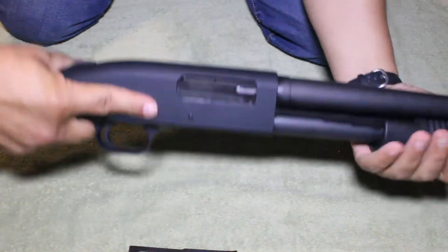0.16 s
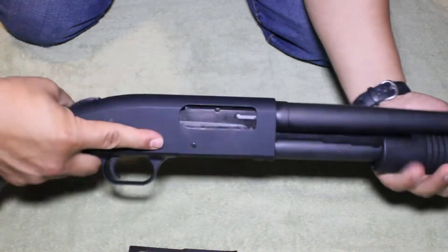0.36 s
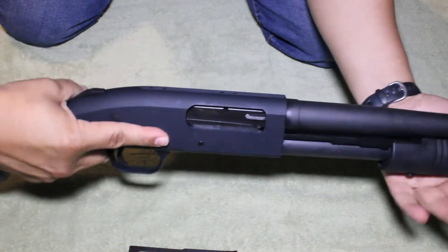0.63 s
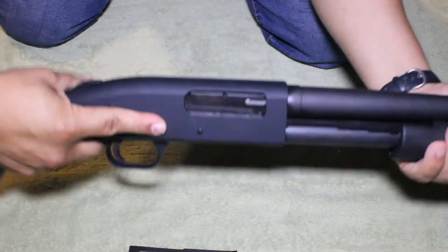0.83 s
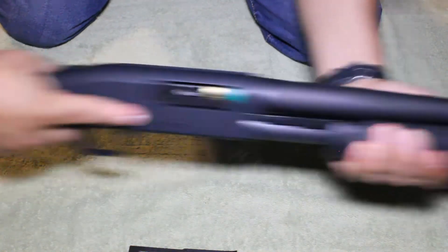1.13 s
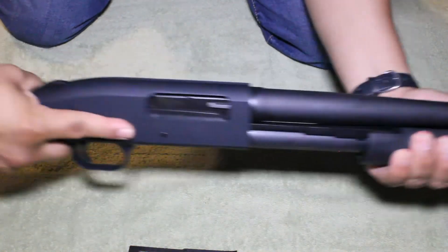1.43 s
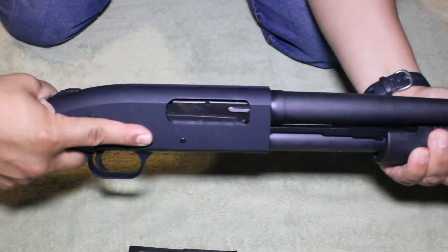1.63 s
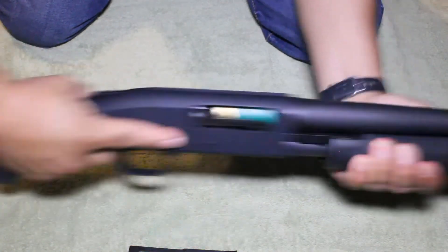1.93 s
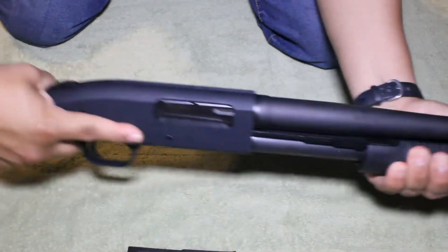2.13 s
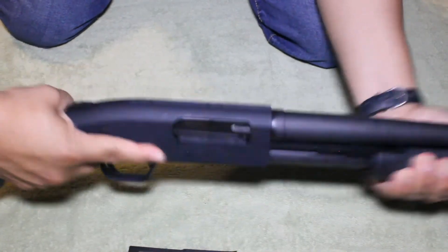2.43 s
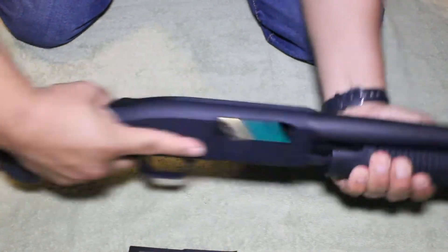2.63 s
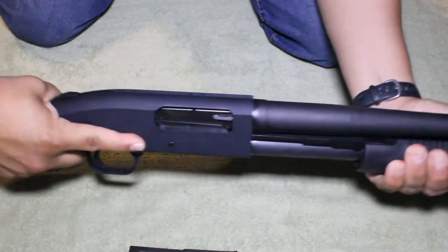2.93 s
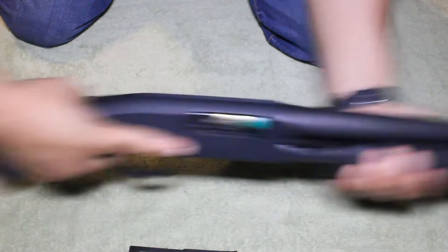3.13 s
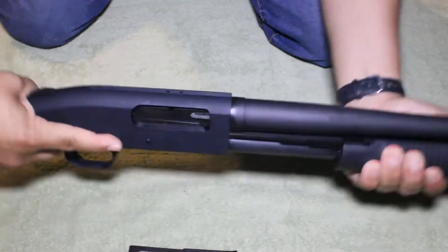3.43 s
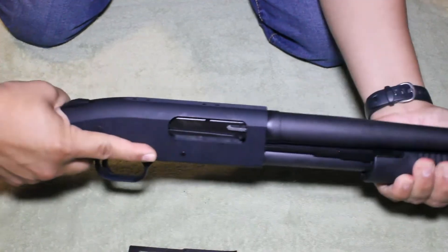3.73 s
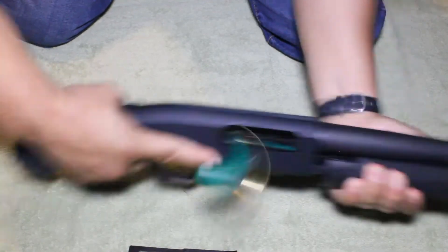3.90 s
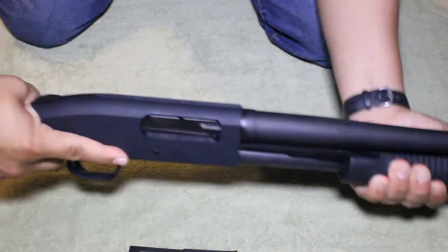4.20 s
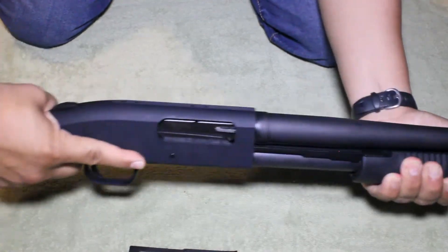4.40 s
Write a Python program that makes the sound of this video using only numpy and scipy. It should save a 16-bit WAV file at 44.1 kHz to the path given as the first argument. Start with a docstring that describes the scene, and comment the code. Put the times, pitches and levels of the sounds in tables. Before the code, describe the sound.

A pump-action shotgun is racked hard again and again, loud sharp metallic clacks close up in a small quiet room.

```python
"""A small quiet room, with a pump shotgun racked hard again and again close to the microphone.
Each pull and push plays its own fixed run of steel contacts, bursts of tiny impacts ringing the gun's modes.
Damped sine clusters make the hollow plastic knocks; band-limited bursts make the stock thumps and scuffs.
Shaped noise makes the shuffling cloth, hiss and low rumble; steady sines make a thin whine.
The room answers with dense reflections and a few low standing waves."""
import sys
import numpy as np
from scipy import signal
from scipy.fft import rfft, irfft
from scipy.io import wavfile
from scipy.ndimage import uniform_filter1d, map_coordinates

SR = 44100
rng = np.random.default_rng(int(sys.argv[2]) if len(sys.argv) > 2 else 0)


def pcm_store(signal):
    """Save signal as 16-bit PCM."""
    levels = np.round(np.clip(np.atleast_2d(signal), -1, 1) * 32767)
    wavfile.write(sys.argv[1], SR, levels.astype(np.int16).T)


N = 200998
TIME = np.arange(N) / SR  # s
HZ = np.fft.rfftfreq(4096, 1 / SR)  # frequency grid of every filter

# spectrum of the background hiss: [pitch_hz, density_db_per_hz (relative)]
HISS_SPECTRUM = [(120, -41), (200, -10.5), (465, -8), (1060, -6), (3560, -12), (4860, -10), (8120, -18),
                 (9060, -19), (9930, -15.5), (16000, -26.5)]
# steady tones of the whine: [pitch_hz, rms_level_db]
WHINE_TONES = [(4696, -64), (9394, -63.8), (14088, -80)]
# sinking of the background after each stop, brief and lasting: [depth_db, recovery_s]
BACKGROUND_DIPS = [(-19, .165), (-4.4, 1.7)]
# decay of the room's reflections: [pitch_hz, t60_s]
ROOM_DECAY = [(150, 0.083), (400, .32), (1040, 0.31), (3300, 0.32), (7300, 0.32), (15000, 0.24)]
# colour of the room's reflections: [pitch_hz, level_db]
REFLECTION_COLOUR = [(100, -5.5), (400, -1.5), (1200, 1), (3500, 4.5), (8000, 0), (15000, 0.5)]
# low standing waves that ring on after soft sounds: [pitch_hz, gain_db, t60_s]
STANDING_WAVES = [(76, -9, .24), (168, -3, .3), (270.4, -7, .45), (398, -2.5, .21)]
# spectrum of rubbing cloth: [pitch_hz, density_db_per_hz (relative)]
CLOTH_SPECTRUM = [(25, -9), (50, -7), (78, 0), (120, -2), (270, -8.5), (500, -14), (1200, -32.5),
                  (4000, -42.5), (16000, -61)]
# sleeves and knees shuffling on the mat: [start_s, length_s, level_db]
CLOTH_MOVES = [(0, .04, -62), (2.09, .02, -62), (2.65, .26, -50.5), (3.0, .08, -53)]
# palm scuffing the forend: [start_s, level_db, pitch_hz, length_s]
PALM_SCUFFS = [(0, -50, 1610, .11), (.240, -47, 1450, .08), (1.626, -28, 2300, .017),
               (2.733, -41.5, 1520, .012), (3.747, -39.5, 1510, .014), (4.385, -39, 1420, .037)]
# faint pure tones that linger after a contact: [start_s, level_db, pitch_hz, t60_s]
LINGERING_TONES = [(.6905, -30, 3950, .04), (1.100, -44, 263, .2), (3.315, -43, 270, .39),
                   (4.030, -44, 5250, .59)]
# dull thumps of stock, hands and shells on the mat: [start_s, level_db, pitch_hz, t60_s]
SOFT_BLOWS = [(1.093, -22, 86.6, .032), (1.987, -27, 409, .032), (2.002, -23, 380, .036),
              (2.094, -41.5, 199.5, .079), (2.358, -24.5, 248, .044), (2.64, -32, 85, .09),
              (2.733, -34, 330, .16), (2.843, -40.5, 600, .057), (2.984, -43, 260, .11),
              (3.246, -20.5, 420, .043), (3.312, -35, 125, .04), (3.504, -33, 320, .039),
              (3.716, -50, 200, .071), (4.101, -35.5, 406, .046), (4.157, -38, 560, .059)]
# thump of the stock at the end of a pull: [delay_after_stop_s, level_db, pitch_hz, t60_s]
PULL_STOCK_THUMP = (.003, -25.5, 335, .04)
# the same at the end of a push: [delay_after_stop_s, level_db, pitch_hz, t60_s]
PUSH_STOCK_THUMP = (.011, -27, 268, .045)
# hollow knocks of forend and shells: [start_s, level_db, pitch_hz, t60_s]
HOLLOW_KNOCKS = [(.286, -30, 990, .023), (.419, -32.5, 1094, .013), (.6795, -20.5, 1600, .03),
                 (.789, -31.5, 1180, .014), (.8216, -15.5, 1610, .025), (.825, -16.5, 1620, .022),
                 (1.021, -26.5, 1707, .069), (1.634, -10, 2380, .016), (1.634, -23.5, 986, .063),
                 (2.004, -22.5, 1650, .06), (2.742, -23, 1760, .07), (2.748, -21.5, 1530, .065),
                 (3.248, -12.5, 1664, .04), (3.755, -25.5, 1450, .051)]
# overall colour of the steel action: [pitch_hz, density_db_per_hz (relative)]
STEEL_COLOUR = [(59, -43.5), (100, -17), (381, -17), (662, -11), (1130, -6.5), (1280, -2), (1450, -6.5),
                (1680, -2), (2080, -2), (2470, -1), (2690, -2.5), (3700, 0.5), (12100, -1.5), (15000, -3),
                (16000, -30)]
# modes of receiver, barrel and magazine tube: [pitch_hz, width_hz, nominal_db_above_colour]
GUN_MODES = [(1343, 70, 3), (1636, 110, 3.5), (1902, 40, 0), (2140, 40, -0.5), (2453, 70, 3.5),
             (3280, 180, 1), (3550, 120, 1.5), (4381, 70, -2), (4700, 40, 4.5), (5390, 60, 3),
             (6554, 120, 4.5), (6980, 58, 3.5), (9794, 44, 6.5), (12700, 100, 4.5)]
# contacts of a pull; latch and unlock count from their own moments, the rest from the stop:
# [part, offset_s (before slowness), bass_db, middle_db, treble_db (before stroke trims), t60_s, chatter_s]
PULL_CONTACTS = [("latch", 0, -47, -33, -31, .035, 0), ("unlock", 0, -39, -18.5, -25, .023, 0),
                 ("bolt", -.0472, -33, -19, -10, .024, 0), ("travel", -.039, -40, -16, -8.5, .042, 0),
                 ("travel", -.024, -40, -18.5, -10, .036, 0), ("travel", -.0135, -42, -26, -11, .055, 0),
                 ("travel", -.007, -42, -24.5, -21, .035, 0), ("stop", 0, -34, -17.5, -12, .032, .013),
                 ("stop", .0195, -43, -24, -15, .055, 0), ("rebound", .044, -40, -24, -15.5, .062, 0),
                 ("rebound", .055, -57, -28, -22, .015, 0)]
# contacts of a push, timed alike:
# [part, offset_s (before slowness), bass_db, middle_db, treble_db (before stroke trims), t60_s, chatter_s]
PUSH_CONTACTS = [("latch", 0, -55, -30, -27, .07, 0), ("unlock", 0, -49, -31, -28, .1, 0),
                 ("bolt", -.042, -36.5, -25, -9.5, .028, 0), ("travel", -.05, -52, -33, -25, .03, .022),
                 ("travel", -.035, -43, -19, -14, .048, 0), ("stop", -.0195, -29, -13, -9.5, .043, 0),
                 ("stop", -.0145, -36, -26, -19, .02, 0), ("stop", 0, -33, -21.5, -12, .032, .015),
                 ("rebound", .036, -42, -23.5, -25, .05, 0)]
# pulls, with a trim for each part (body is bass and middle): [stop_s, slowness (ratio), latch_s, unlock_s,
# body_db, latch_db, unlock_db, bolt_db, travel_db, stop_db, rebound_db, thump_db]
PULL_STROKES = [(.8899, 1.03, .8215, .8355, 1, 0, -8, .5, .5, 0, 0, -1.5),
                (1.6936, .975, 1.6172, 1.635, 0, 3, 2, 1, .5, 1, 0, -3),
                (2.4281, .97, 2.3536, 2.3709, -1.5, -7, 0, -2, -.5, -.5, -2, 3),
                (3.0877, .93, 3.0165, 3.031, -1, -5, -5, -6, 0, .5, -3, 0),
                (3.8191, 1.0, 3.7541, 3.7653, .5, -3, -4, -9, .5, 0, -10, -7),
                (4.4596, 1.0, 4.39, 4.4058, -.5, -7, 0, -7, 0, 0, -15, 2)]
# pushes, trimmed alike: [stop_s, slowness (ratio), latch_s, unlock_s,
# body_db, latch_db, unlock_db, bolt_db, travel_db, stop_db, rebound_db, thump_db]
PUSH_STROKES = [(1.0839, .98, 1.015, 1.0214, 1.5, -2.5, -5, -1, -14, .5, -9, 3),
                (1.9087, 1.01, 1.8376, 1.8556, 0, 0, -5, 0, -15, 1, -1, -2),
                (2.6318, 1.01, 2.5545, 2.5685, 0, -3, 2, -5, -1, -.5, 0, 5.5),
                (3.3018, 1.01, 3.2259, 3.249, 0, 5.5, 7.5, -8, 5, -1, -10, -6),
                (4.0081, .99, 3.9457, 3.9537, 0, 6.5, 4, -2, -7, .5, -8, -1.5)]
# contacts of catches, loose shells and grip between strokes: [start_s, bass_db, middle_db, treble_db, t60_s]
LOOSE_CONTACTS = [(.252, -55, -48.5, -49, .2), (.286, -43.5, -43.5, -47, .04),
                  (.6808, -43, -29.5, -42.5, .02), (.6905, -37, -26.5, -40, .031),
                  (1.9858, -34.5, -28.5, -46, .054), (1.9964, -35, -27, -11, .018),
                  (2.0019, -31, -24, -15.5, .02), (2.7434, -31, -24, -22.5, .045),
                  (2.782, -38.5, -48.5, -41, .017), (2.818, -55, -54, -44, .014),
                  (3.503, -50, -54, -51, .016), (3.7188, -56, -53.5, -56, .02),
                  (3.74, -59.5, -49.5, -52, .021), (4.2811, -61, -61, -55, .017)]
# typical faint tick of settling hands: [bass_db, middle_db, treble_db, t60_s]
HAND_TICK = (-58, -53, -60, .04)


def gain_of(db):
    """Decibels to amplitude."""
    return 10 ** (np.asarray(db) / 20)


def evened(x):
    """Scaled to rms 1."""
    return x / np.sqrt(np.mean(x ** 2) + 1e-20)


def read(points, hz):
    """A spectrum table read on a log-frequency axis."""
    f, value = np.transpose(points)
    return np.interp(np.log(hz + 1), np.log(f + 1), value)


def add(mix, s, sound):
    """Mixes a sound in at time s."""
    part = mix[max(round(s * SR), 0):][:len(sound)]
    part += sound[:len(part)]


def dying(t, t60):
    """Amplitude that falls 60 dB in t60 seconds."""
    return np.exp(-np.log(1000) * t / max(t60, 1e-3))


def band(lo_hz, hi_hz, order=4):
    """Gain of a band-pass with smooth skirts."""
    low_side = 1 + (lo_hz / (HZ + 1)) ** (2 * order)
    high_side = 1 + (HZ / hi_hz) ** (2 * order)
    return 1 / np.sqrt(low_side * high_side)


def causal(gain):
    """Minimum-phase impulse response: a body with this gain rings only after the blow."""
    mirrored = np.r_[gain, gain[-2:0:-1]]
    log_gain = np.log(np.maximum(mirrored / gain.max(), 1e-4))
    response = np.fft.ifft(np.exp(np.conj(signal.hilbert(log_gain)))).real
    return response[:len(HZ) // 2]


def noise(gain):
    """Steady noise of rms 1, shaped by this gain over frequency."""
    spectrum = rfft(rng.standard_normal(N))
    return evened(irfft(spectrum * np.interp(np.fft.rfftfreq(N, 1 / SR), HZ, gain), N))


def strike(force, response):
    """A burst of tiny random impacts rings a body; the sound has the energy of the force."""
    sound = signal.fftconvolve(force * rng.standard_normal(len(force)), response)
    return sound * np.sqrt(np.sum(force ** 2) / (np.sum(sound ** 2) + 1e-20))


def background(hiss_db=-56, rumble_db=-57.5, rumble_lo_hz=108, rumble_hi_hz=158, rumble_sink=0.56):
    """Noise hiss and rumble with a sine whine; all sink after each stop and swell back, the rumble less."""
    level_db = np.zeros(N)
    for stop, *_ in list(PULL_STROKES) + list(PUSH_STROKES):
        for depth_db, recovery in BACKGROUND_DIPS:
            level_db += depth_db * (TIME > stop) * np.exp(-abs(TIME - stop) / recovery)
    hiss = gain_of(hiss_db) * noise(gain_of(read(HISS_SPECTRUM, HZ)))
    rumble_band = band(rumble_lo_hz, rumble_hi_hz, order=8)
    rumble = gain_of(rumble_db + rumble_sink * level_db) * noise(rumble_band)
    whine = sum(np.sqrt(2) * gain_of(db) * np.sin(2 * np.pi * hz * TIME) for hz, db in WHINE_TONES)
    return (hiss + whine) * gain_of(level_db) + rumble


def room(x, wet_db=-9.5, first_s=0.0034, build_s=0.0017, count=6, turn_hz=17):
    """Reflections, each band dying at its own speed; equally dense patterns take turns to keep the ringing smooth."""
    out = np.zeros(N)
    for k in range(count):
        hz, t, z = signal.stft(rng.standard_normal(SR * 2 // 3), SR, nperseg=256)
        decay = np.exp(-np.log(1000) * t / read(ROOM_DECAY, hz)[:, None])
        colour = gain_of(read(REFLECTION_COLOUR, hz))[:, None]
        tail = signal.istft(z * decay * colour, SR)[1]
        since_first = np.maximum(np.arange(len(tail)) / SR - first_s, 0)
        tail *= 1 - np.exp(-since_first / build_s)
        # the patterns take turns, turn_hz rounds a second
        away = abs((TIME * turn_hz * count - k) % count - count / 2)
        share = np.cos(np.pi / 2 * np.minimum(away, 1))  # the squares of all shares sum to 1
        out += signal.fftconvolve(x * share, tail / np.linalg.norm(tail))[:N]
    return gain_of(wet_db) * out


def boom(x):
    """Standing waves of the room: decaying cosines excited by the sound x."""
    t = np.arange(SR // 2) / SR
    response = np.zeros(len(t))
    for hz, db, t60 in STANDING_WAVES:
        decay = dying(t, t60)
        # scaled so that db is the gain at its own pitch
        response += gain_of(db) * np.cos(2 * np.pi * hz * t) * decay * 2 / decay.sum()
    return signal.fftconvolve(x, response)[:N]


def shuffle(rise_s=.015, t60_s=.35, rest_db=-78, lumps_db=2):
    """Dull rubbing of cloth over a faint steady rustle: each move rises, drags unevenly and dies away."""
    moves = np.zeros(N)
    for s, length, db in CLOTH_MOVES:
        rise = np.clip((TIME - s) / rise_s, 0, 1)
        moves += gain_of(db) * rise * dying(np.maximum(TIME - s - length, 0), t60_s)
    lumps = evened(uniform_filter1d(rng.standard_normal(N), size=1300))
    envelope = gain_of(rest_db) + moves * gain_of(lumps_db * lumps)
    return noise(gain_of(read(CLOTH_SPECTRUM, HZ))) * envelope


def scuffs(breadth=1.1):
    """Short rubs swell and fade in the hollow plastic, as noise in a narrow band."""
    out = np.zeros(N)
    for s, db, hz, length in PALM_SCUFFS:
        force = gain_of(db) * np.sin(np.pi * np.linspace(0, 1, int(length * SR) + 2))
        add(out, s, strike(force, causal(band(hz / breadth, hz * breadth, order=3))))
    return out


def rings():
    """Lightly damped single modes."""
    out, t = np.zeros(N), np.arange(SR // 2) / SR
    for s, db, hz, t60 in LINGERING_TONES:
        add(out, s, gain_of(db) * np.sin(2 * np.pi * hz * t) * dying(t, t60))
    return out


def stock_thumps():
    """The stop shakes the stock: one (start_s, level_db, pitch_hz, t60_s) for every stroke."""
    found = []
    for thump, strokes in [(PULL_STOCK_THUMP, PULL_STROKES), (PUSH_STOCK_THUMP, PUSH_STROKES)]:
        delay, db, hz, t60 = thump
        found += [(row[0] + delay, db + row[-1], hz, t60) for row in strokes]
    return found


def thumps(breadth=1.48, rise_s=.002):
    """Soft blows push a broad low resonance."""
    out, t = np.zeros(N), np.arange(SR // 5) / SR
    for s, db, hz, t60 in stock_thumps() + list(SOFT_BLOWS):
        force = gain_of(db) * dying(t, t60) * (1 - np.exp(-t / rise_s))
        add(out, s - rise_s, strike(force, causal(band(hz / breadth, hz * breadth, order=3))))
    return out


def knocks(spread=.09, overtone_db=-9, rise_s=0.00047):
    """A hollow plastic part rings with a close cluster of damped modes."""
    out, t = np.zeros(N), np.arange(SR // 6) / SR
    for s, db, hz, t60 in HOLLOW_KNOCKS:
        lower, upper = 1 + spread * rng.uniform(0.48, 0.88, 2) * [-1, 1]
        turn = 2 * np.pi * hz * t
        neighbours = np.sin(turn * lower) - np.sin(turn * upper)
        ring = np.sin(turn) + gain_of(overtone_db) * neighbours
        add(out, s, gain_of(db) * ring * dying(t, t60) * (1 - np.exp(-t / rise_s)))
    return out


def stroke(run, stop, slowness, latch_s, unlock_s, body_db,
           latch_db, unlock_db, bolt_db, travel_db, stop_db, rebound_db, thump_db):
    """Contacts of one stroke: a slower hand spreads them out, the hold on the gun sets their body."""
    cues = {"latch": (latch_s, latch_db), "unlock": (unlock_s, unlock_db), "bolt": (stop, bolt_db),
            "travel": (stop, travel_db), "stop": (stop, stop_db), "rebound": (stop, rebound_db)}
    for part, offset, bass, middle, treble, t60, chatter in run:
        moment, db = cues[part]
        yield moment + slowness * offset, bass + db + body_db, middle + db + body_db, treble + db, t60, chatter


def contacts(grip_count=7, grip_spread_db=3.5):
    """All steel contacts, as (start_s, bass_db, middle_db, treble_db, t60_s, chatter_s)."""
    hits = []
    for run, strokes in [(PULL_CONTACTS, PULL_STROKES), (PUSH_CONTACTS, PUSH_STROKES)]:
        for row in strokes:
            hits += stroke(run, *row)
    hits += [(*row, 0) for row in LOOSE_CONTACTS]
    *levels, t60 = HAND_TICK
    for _ in range(grip_count):  # hands settle at random moments before the first stop
        s = rng.random() * PULL_STROKES[0][0]
        hits.append((s, *np.add(levels, grip_spread_db * rng.standard_normal()), t60, 0))
    return hits


def contact_colour(part_db=2.3, part_width_hz=420):
    """Each blow lands elsewhere: it excites the gun's modes unequally and adds those of the small part struck."""
    colour = gain_of(read(STEEL_COLOUR, HZ))
    for (hz, width, db), share in zip(GUN_MODES, rng.uniform(0, 1.5, len(GUN_MODES))):
        resonance = 1 / (1 + (2 * (HZ - hz) / width) ** 2)
        colour = colour * (1 + share * (gain_of(db) - 1) * resonance)
    ripple = map_coordinates(rng.standard_normal(200), [HZ / part_width_hz], mode="mirror")
    return colour * gain_of(part_db * ripple)


def action(chatter_db=2.5, grit_db=2.5, crack=0.75, crack_s=0.00084, bass_hz=200, middle_hz=800, treble_hz=3500):
    """Steel contacts crack and ring the gun's modes; some, as at the stops, chatter before they settle."""
    edges = [bass_hz, middle_hz, treble_hz, SR / 2]  # lower edge of each band, then the top
    bands = [band(lo, hi) for lo, hi in zip(edges, edges[1:])]
    out, t = np.zeros(N), np.arange(SR // 8) / SR
    for s, *levels, t60, chatter in contacts():
        bounces = evened(uniform_filter1d(rng.standard_normal(len(t)), size=40))  # loose parts touch unevenly
        if chatter > 0:
            force = dying(np.maximum(t - chatter, 0), t60) * evened(gain_of(chatter_db * bounces))
        else:
            opening = 1 + crack * np.exp(-t / crack_s)
            force = dying(t, t60) * opening * evened(gain_of(grit_db * bounces))
        colour = contact_colour()
        for db, part in zip(levels, bands):
            add(out, s, gain_of(db) * strike(force, causal(colour * part)))
    return out


def scene(knock_room_db=-6, thump_room_db=-2):
    """The background, the room and the close gun; plastic knocks and soft blows carry less far than steel."""
    bed, cloth = background(), shuffle()
    soft, hollow, steel = thumps(), knocks() + scuffs(), action()
    into_room = steel + gain_of(knock_room_db) * hollow + gain_of(thump_room_db) * soft
    echoes = room(into_room) + boom(soft + cloth)
    return (steel + hollow + soft + cloth + rings() + echoes + bed)[None]


def record(dry, ceiling=0.8, low_cut_hz=45, edge_hz=16100):
    """At the microphone the loudest peaks are rounded off, deep bass is cut, then the top is limited."""
    rounded = dry / (1 + (dry / ceiling) ** 4) ** (1 / 4)
    high_pass = signal.butter(2, low_cut_hz, "high", fs=SR, output="sos")
    thinned = signal.sosfilt(high_pass, rounded)
    low_pass = signal.firwin(401, edge_hz, window=("kaiser", 8), fs=SR)
    return signal.oaconvolve(thinned, low_pass[None], "same")


dry = scene()
out = record(dry)
pcm_store(out)
```